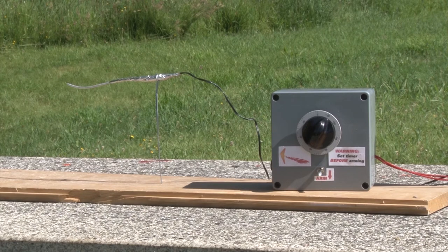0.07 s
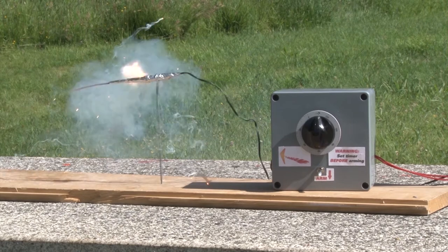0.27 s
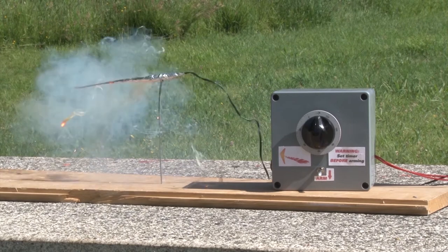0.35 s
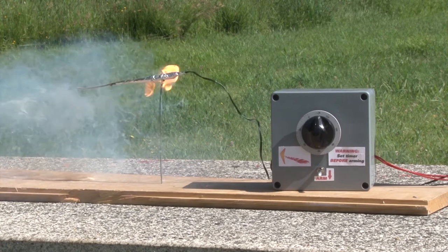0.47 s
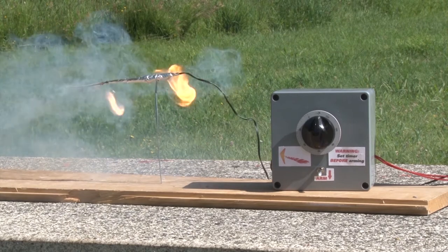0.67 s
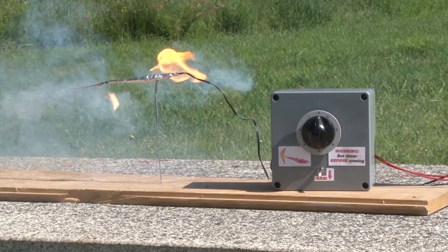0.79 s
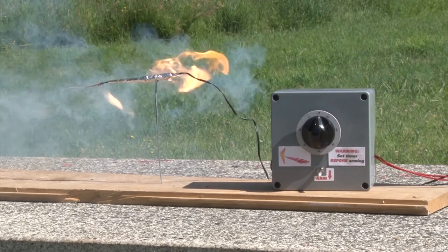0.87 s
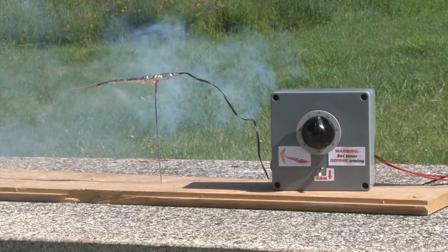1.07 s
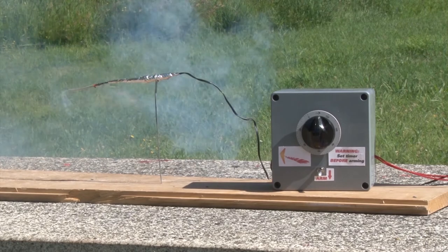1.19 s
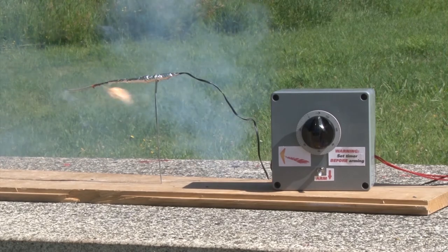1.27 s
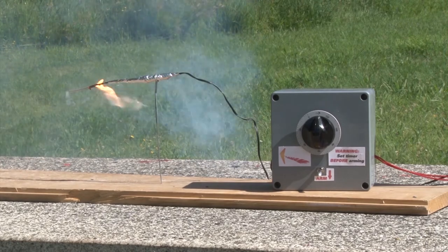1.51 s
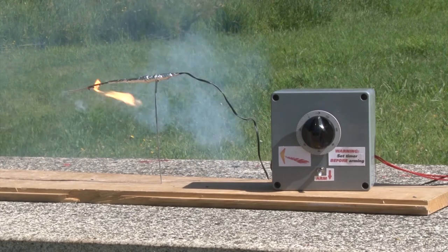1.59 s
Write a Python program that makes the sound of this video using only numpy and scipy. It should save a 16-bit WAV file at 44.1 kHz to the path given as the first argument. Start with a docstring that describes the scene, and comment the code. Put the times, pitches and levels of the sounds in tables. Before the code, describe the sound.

An igniter bursts with a sharp pop, then hisses and burns with a fizzing flame.

```python
"""A faint sputter, then a rapid string of cracks and a thump: the coating of an igniter on a wire bursts.
It flares, snaps open and lets out a hissing gas jet, with whistles that fall as the vents widen.
It spurts once more and burns on with a fizzing, fluttering flame.
Outdoors over grass, where an insect trills in still air."""
import sys
import numpy as np
from scipy import signal
from scipy.fft import rfft, irfft, next_fast_len
from scipy.io import wavfile
from scipy.ndimage import map_coordinates

SR = 44100
rng = np.random.default_rng(int(sys.argv[2]) if len(sys.argv) > 2 else 0)


def file_out(sig):
    """Save sig as 16-bit WAV at sys.argv[1]."""
    # one column per channel
    cols = np.atleast_2d(sig).T
    # limit, then scale
    lim = np.clip(cols, -1, 1)
    pcm = np.round(lim * 32767).astype(np.int16)
    wavfile.write(sys.argv[1], SR, pcm)


N = 72765
TOP_HZ = 16150


def amp(db):
    """Decibels to gain."""
    return 10 ** (np.asarray(db) / 20)


def unit(x):
    """Scale to rms 1."""
    return x / np.sqrt(np.mean(x ** 2) + 1e-20)


def since(start_s):
    """Seconds since start_s, zero before."""
    return np.maximum(np.arange(N) / SR - start_s, 0)


def envelope(points):
    """Gain along (time_s, level_db) points."""
    return amp(np.interp(since(0), *np.transpose(points)))


def wobble(rate_hz):
    """Smooth random curve, rate_hz knots a second."""
    knots = rng.standard_normal(int(N * rate_hz / SR) + 4)
    return map_coordinates(knots, [since(0) * rate_hz])


def filtered(x, response):
    """Apply a gain given as a function of frequency."""
    size = next_fast_len(N + SR // 4)
    return irfft(rfft(x, size) * response(np.fft.rfftfreq(size, 1 / SR)), size)[:N]


def shaped(x, colour):
    """Filter by (freq_hz, gain_db) points."""
    freq_hz, gain_db = np.transpose(colour)
    return filtered(x, lambda hz: amp(np.interp(np.log(hz + 1), np.log(freq_hz + 1), gain_db)))


def noise(colour):
    """Coloured noise, rms 1."""
    return unit(shaped(rng.standard_normal(N), colour))


def burst(start_s, t60_s, attack_s):
    """Envelope: quick attack, exponential decay."""
    t = since(start_s)
    return (1 - np.exp(-t / attack_s)) * amp(-60 * t / t60_s)


def push(start_s, hz, decay_s, attack_s):
    """Pressure step that swings back and dies away quickly."""
    t = since(start_s)
    swing = np.sin(2 * np.pi * hz * t) * np.exp(-t / decay_s) * (1 - np.exp(-t / attack_s))
    return -np.diff(swing, prepend=0) * SR / (2 * np.pi * hz)


def sizzle(colour, flicker_db, grains_per_s=2700, grain_share=0.43):
    """Flickering gas hiss; tiny bursts carry grain_share of the power."""
    grains = unit((rng.random(N) < grains_per_s / SR) * rng.standard_normal(N))
    gas = np.sqrt(grain_share) * grains + np.sqrt(1 - grain_share) * rng.standard_normal(N)
    return unit(shaped(gas, colour) * amp(flicker_db * wobble(130)))


def patchy(x, depth_db, patch_hz=521, patch_s=0.1091):
    """Colour drifts in slow patches as the flame moves about."""
    hz, t, spectrum = signal.stft(x, SR, nperseg=512)
    knots = rng.standard_normal((128, 128))
    grid = np.meshgrid(hz / patch_hz, t / patch_s, indexing='ij')
    drift_db = depth_db * map_coordinates(knots, grid, mode='mirror')
    _, drifting = signal.istft(spectrum * amp(drift_db), SR, nperseg=512)
    return unit(drifting[:N])


# Trill envelope: time_s, level_db
INSECT_LEVEL = [(0, -65), (.06, -61.5), (.125, -55), (.18, -62), (.3, -76), (1.0, -69), (1.65, -70)]
# Trill and air spectra: freq_hz, gain_db
INSECT_COLOUR = [(2500, -62), (4200, -26), (4650, -9.5), (4860, -4), (5030, -12), (5700, -38), (8500, -51),
                 (9450, -32), (10500, -48), (16000, -57)]
AIR_COLOUR = [(30, 17.5), (70, 20), (150, -2), (400, -1), (2000, 0.5), (3400, 5), (6000, -5), (11000, -31),
              (16000, -30)]

def meadow():
    """An insect's pulsing trill over still air."""
    trill = unit(noise(INSECT_COLOUR) * amp(2.7 * wobble(68.9)))
    return envelope(INSECT_LEVEL) * trill + amp(-69.5) * noise(AIR_COLOUR)


# Flame envelopes: time_s, level_db
ROAR_LEVEL = [(.2, -76), (.23, -47), (.266, -57), (.33, -34.5), (.376, -41.5), (.42, -48.5), (.486, -48.5),
              (.514, -36.5), (.56, -55.5), (.61, -58), (.65, -51.5), (.85, -56.5), (.96, -49), (1.06, -49),
              (1.11, -42), (1.17, -40.5), (1.24, -44.5), (1.27, -52.5), (1.31, -44), (1.43, -46.5),
              (1.65, -47.5)]
BILLOW_LEVEL = [(0, -83), (.13, -72.5), (.28, -66), (.325, -40), (.365, -61), (.405, -45), (.45, -74),
                (.485, -50), (.515, -52), (.56, -64), (.67, -45), (.73, -51.5), (.85, -64.5), (.96, -45),
                (1.025, -45), (1.07, -72), (1.23, -50.5), (1.45, -65), (1.65, -61)]
# Flame spectra: freq_hz, gain_db
ROAR_COLOUR = [(24, -59), (40, -19), (176, -3), (279, -0.5), (1080, -9.5), (1310, -14), (1440, -21.5),
               (1800, -23), (2340, -53), (3960, -120)]
BILLOW_COLOUR = [(15, -29), (45, -5), (120, 0), (230, -4.5), (450, -11.5), (1200, -69)]
# Flame puffs: start_s, level_db, pitch_hz
PUFFS = [(.3245, -17, 126), (.3375, -18.5, 250), (.3928, -27, 302), (.402, -26, 150), (0.5111, -24.5, 166),
         (.5188, -25, 127), (1.028, -30.5, 78), (1.162, -22, 284), (1.1695, -23, 324), (1.241, -20.5, 240),
         (1.2455, -23, 312)]

def flame(puff_decay_cycles=0.42):
    """The flame roars with a fast flutter, billows low and puffs."""
    roar = envelope(ROAR_LEVEL) * unit(noise(ROAR_COLOUR) * amp(1.9 * wobble(130)))
    billow = envelope(BILLOW_LEVEL) * noise(BILLOW_COLOUR)
    puffs = sum(amp(db) * push(start_s, hz, puff_decay_cycles / hz, attack_s=0.00096)
                for start_s, db, hz in PUFFS)
    return roar + billow + puffs


# Burn envelope: time_s, level_db
FIZZ_LEVEL = [(.6, -100), (.85, -68.5), (1.0, -59), (1.08, -57), (1.18, -47), (1.3, -54.5), (1.37, -55),
              (1.44, -58), (1.56, -55), (1.615, -51.5), (1.65, -57)]
# Burn spectrum: freq_hz, gain_db
FIZZ_COLOUR = [(880, -33), (1500, -5), (1870, -6), (2060, -15), (2270, -4), (2590, -8), (2830, -2),
               (3590, 0), (4040, -4.5), (4500, -11.5), (5330, -6.5), (6890, -8), (8570, -17.5),
               (10100, -10.5), (11700, -20.5), (15100, -19.5), (16000, -26)]

def fizz():
    """The steady burn fizzes to the end."""
    return envelope(FIZZ_LEVEL) * patchy(sizzle(FIZZ_COLOUR, flicker_db=1.34), depth_db=2.0)


# Spurt envelope: time_s, level_db
SPURT_LEVEL = [(.85, -100), (.915, -56), (.95, -42.5), (.98, -40), (1.0, -45.5), (1.022, -43),
               (1.045, -54.5), (1.12, -100)]
# Spurt spectrum: freq_hz, gain_db
SPURT_COLOUR = [(820, -45), (1400, -17), (1720, -11.5), (2260, -4.5), (3160, -2.5), (3580, -10),
                (3840, -22), (4380, -1.5), (5830, -3), (6200, -5), (6800, 2), (9130, -8.5), (11700, -4),
                (15100, -15), (16000, -7.5)]
# Spits: start_s, level_db, t60_s
SPITS = [(.944, -50, .04), (.981, -47, 0.026), (1.017, -43, 0.038)]

def spurt():
    """A late, spitting spurt of gas."""
    spits = sum(amp(db) * burst(start_s, t60_s, attack_s=0.001) for start_s, db, t60_s in SPITS)
    gas = patchy(sizzle(SPURT_COLOUR, flicker_db=1.7), depth_db=2.0)
    return (envelope(SPURT_LEVEL) + spits) * gas


# Gas envelopes: time_s, level_db
FLARE_LEVEL = [(.2, -90), (.245, -55), (.285, -43), (.328, -34.5), (.36, -39), (.39, -41), (.43, -74),
               (.5, -110)]
JET_LEVEL = [(.388, -77), (.394, -34), (.425, -37.5), (.445, -30.5), (.47, -35.5), (.5, -53), (.56, -80),
             (.62, -110)]
TAIL_LEVEL = [(.39, -100), (.47, -44.5), (.55, -48), (.64, -53), (.73, -55.5), (.8, -60), (.9, -58.5),
              (1.1, -65), (1.3, -100)]
# Gas spectra: freq_hz, gain_db
FLARE_COLOUR = [(710, -29), (1200, -6), (1490, -9), (2110, -3), (2450, -6.5), (2830, -1), (4040, -8.5),
                (4860, -1), (6580, -4.5), (7820, -0.5), (10100, -8.5), (12200, -11.5), (16000, -23)]
JET_COLOUR = [(880, -29), (1500, -10.5), (2100, -16), (2320, -8), (2590, -10), (3180, -3.5), (3920, -4.5),
              (4370, -13), (4830, -2.5), (5660, -1), (6180, -4), (8240, -5), (9100, 3.5), (10200, -4),
              (11700, -12), (14100, -2), (16000, -11)]
TAIL_COLOUR = [(880, -41), (1500, -8), (1780, -18), (2080, -4.5), (2940, -2), (3480, -2), (4000, -9),
               (5280, -5), (5880, -4), (7540, -6), (8400, -11), (9850, -5.5), (11500, -9), (15100, -14),
               (16000, -20)]

def gas_jet():
    """Gas flares up, jets from the opened crust and trails off."""
    flare = envelope(FLARE_LEVEL) * sizzle(FLARE_COLOUR, flicker_db=0.97)
    jet = envelope(JET_LEVEL) * sizzle(JET_COLOUR, flicker_db=2.3)
    tail = envelope(TAIL_LEVEL) * patchy(sizzle(TAIL_COLOUR, flicker_db=1.3), depth_db=1.5)
    return flare + jet + tail


# Vent whistles: start_s, length_s, start_hz, halve_s, gain_db, fall_db_per_s, overtone_loss_db
WHISTLES = [(0.4133, 0.024, 7980, .0173, -19, 380, 8), (.4355, .016, 3410, .032, -26.5, 900, 3),
            (0.466, .011, 3415, 0.038, -36.5, 200, 5), (0.499, 0.0093, 3190, 0.25, -47, 300, 15)]
# Whistle filter: freq_hz, gain_db
WHISTLE_COLOUR = [(2000, -20), (3200, -1.5), (4600, -6), (6500, 2.5), (7500, -1), (8000, -5), (9000, 5.5),
                  (10000, 9.5), (11200, 4), (12000, -8), (16000, -12)]

def whistles(jitter=0.0216, edge_s=0.0016):
    """Gas whistles through widening vents: the period grows steadily, so the pitch falls."""
    tones = np.zeros(N)
    for start_s, length_s, start_hz, halve_s, gain_db, fall_db_per_s, overtone_loss_db in WHISTLES:
        t = since(start_s)
        pitch_hz = start_hz / (1 + t / halve_s) * (1 + jitter * wobble(1500))
        gate = np.clip(np.minimum(t, length_s - t) / edge_s, 0, 1)
        phase = 2 * np.pi * np.cumsum(pitch_hz) / SR
        for k in range(1, 5):
            harmonic_db = gain_db - overtone_loss_db * (k - 1) - fall_db_per_s * t + 1.7 * wobble(400)
            tones += gate * (k * pitch_hz < TOP_HZ) * amp(harmonic_db) * np.sin(k * phase)
    return shaped(tones, WHISTLE_COLOUR)


# First sputters: start_s, level_db, t60_s
SPUTTERS = [(0.136, -55, 0.037), (.155, -45, 0.043)]
# Sputter spectrum: freq_hz, gain_db
SPUTTER_COLOUR = [(180, -60), (300, -35), (680, -5), (1020, -14), (1520, -6), (3490, -3.5), (4980, -15),
                  (6180, -21), (7100, -11), (12000, -61), (15600, -91), (22000, -120)]

def sputter():
    """The coating sputters as the wire heats."""
    gain = sum(amp(db) * burst(start_s, t60_s, attack_s=0.0016) for start_s, db, t60_s in SPUTTERS)
    return gain * noise(SPUTTER_COLOUR)


def crack(start_s, gain_db, t60_s, spike_db=11.5):
    """A pressure spike, then a short spray of noise."""
    spike = np.sinc(np.arange(N) - start_s * SR) * (np.abs(since(0) - start_s) < 8 / SR)
    spray = burst(start_s, t60_s, attack_s=0.0001) * rng.standard_normal(N)
    return amp(gain_db) * (amp(spike_db) * spike + spray)


# Coating cracks: start_s, gain_db, t60_s
CRACKS = [(0.2083, -37, 0.034), (0.2108, -16.5, 0.013), (0.2129, -12.5, 0.016), (0.2154, -9.5, 0.015),
          (0.2174, -11, 0.0091), (0.2187, 0.5, 0.0028), (.2222, -16, 0.0025)]
# Spectra of the cracks and their scatter off bench and ground: freq_hz, gain_db
CRACK_COLOUR = [(290, -36), (500, -14), (1380, -3), (1640, -2), (2040, -5), (3020, -2.5), (3920, -8.5),
                (4660, -4), (4940, -8.5), (5710, -2.5), (6140, -10.5), (7420, -6), (7860, -10.5),
                (8450, -8.5), (10400, -15), (11500, -8), (13800, -21), (15100, -9), (16000, -17)]
SCATTER_COLOUR = [(200, -10), (600, -10), (1500, 7), (3000, 1), (6000, -7), (10000, -12), (16000, -14)]

def pop(blast_s=0.2189):
    """The coating tears and bursts with a sharp front, thump and slow rebound; later the crust snaps."""
    cracks = amp(10) * shaped(sum(crack(*row) for row in CRACKS), CRACK_COLOUR)
    front = amp(1) * push(start_s=0.2184, hz=2360, decay_s=0.00059, attack_s=0.00005)
    thump = amp(0.5) * push(blast_s, hz=132, decay_s=0.001, attack_s=0.00012)
    rebound = -amp(-7) * push(blast_s, hz=49.3, decay_s=0.0052, attack_s=0.0023)
    snap = crack(start_s=0.3925, gain_db=-15, t60_s=0.0051)
    scatter = amp(-22) * burst(blast_s, t60_s=0.032, attack_s=0.0005) * noise(SCATTER_COLOUR)
    return cracks + front + thump + rebound + snap + scatter


def scene():
    """The igniter fires in the open meadow; mono."""
    igniter = sputter() + pop() + gas_jet() + spurt() + fizz() + whistles() + flame()
    return (igniter + meadow())[None]


def record(dry):
    """The pop softly overloads the microphone; steep low-pass at TOP_HZ."""
    ceiling = 0.76
    clipped = dry[0] / (1 + np.abs(dry[0] / ceiling) ** 6) ** (1 / 6)
    return filtered(clipped, lambda hz: 1 / (1 + (hz / TOP_HZ) ** 140))[None]


dry = scene()
out = record(dry)
file_out(out)
```